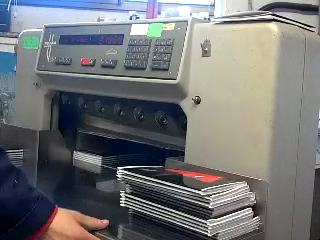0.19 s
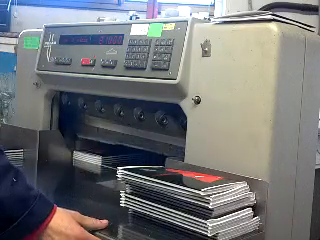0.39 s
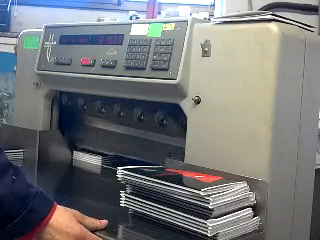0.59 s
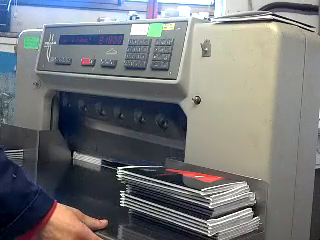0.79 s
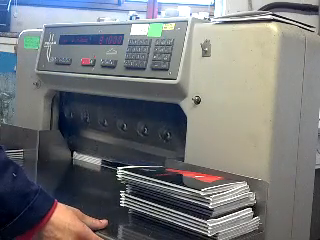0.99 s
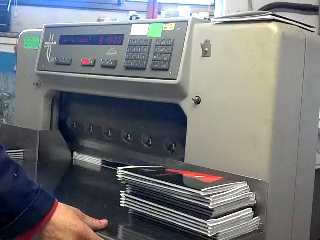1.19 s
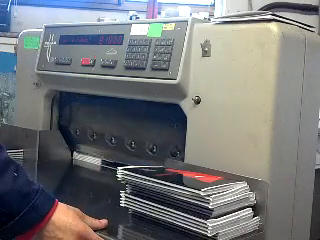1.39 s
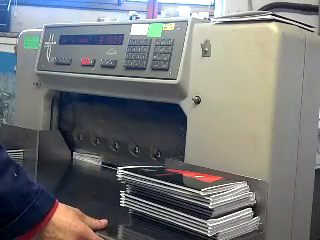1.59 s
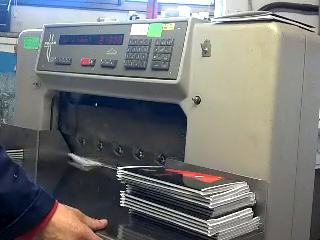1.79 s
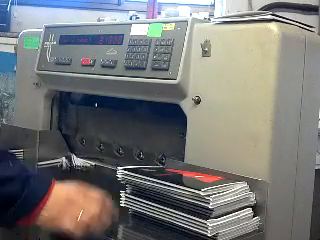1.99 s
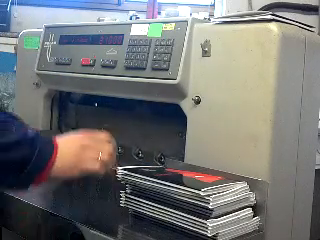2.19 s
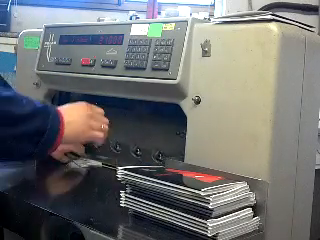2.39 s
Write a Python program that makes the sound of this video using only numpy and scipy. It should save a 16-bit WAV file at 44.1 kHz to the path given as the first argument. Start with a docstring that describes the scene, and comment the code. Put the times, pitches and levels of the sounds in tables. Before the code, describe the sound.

Heavy paper cutting machine cycles once, clanking down, whirring under load, slicing a stack, then knocking to rest

```python
"""A paper guillotine makes one cut in a workshop, heard in two channels close enough to lead the room.
Valves click, the clamp runs down and slams, the clutch bangs in and the brake knocks: noise bursts ring a frame.
The pump, a stack of overtones, sags under load and partly recovers; filtered noise makes the gear train roar.
The knife rasps through the stack in bright noise clumps, over a workshop hum of shaped noise.
The channels share the treble in even bands and fade out above 11 kHz."""
import sys
import numpy as np
from scipy import signal
from scipy.fft import rfft, irfft, next_fast_len
from scipy.io import wavfile
from scipy.ndimage import uniform_filter1d, map_coordinates

SR = 44100
rng = np.random.default_rng(int(sys.argv[2]) if len(sys.argv) > 2 else 0)


def dump_mix(stems):
    """Bounce the given channels to the path in sys.argv[1] as a 16-bit WAV at rate SR."""
    frames = np.atleast_2d(stems).T  # one column per channel
    limited = np.clip(frames, -1, 1)  # hard clip at full scale
    pcm = np.round(limited * 32767).astype(np.int16)
    wavfile.write(sys.argv[1], SR, pcm)


def gain_from_db(level_db):
    """Convert decibel levels to linear amplitude factors (20 dB per decade)."""
    decades = np.asarray(level_db, float) / 20
    return 10 ** decades


N = 105840  # samples, 2.4 s


def along(points, hz):
    """Reads (f/Hz, value) points on a log frequency axis."""
    f, v = np.transpose(points)
    return np.interp(np.log(hz + 1), np.log(f + 1), v)


def unit(x):
    """Scales x to rms 1."""
    return x / np.sqrt(np.mean(x ** 2) + 1e-20)


def curves(rows):
    """Gives one value per sample for each column after the time."""
    s, *cols = np.transpose(rows)
    return [np.interp(np.arange(N) / SR, s, c) for c in cols]


def wobble(rate, n):
    """A smooth random curve of n samples, with rate knots a second."""
    knots = rng.standard_normal(int(n * rate / SR) + 4)
    return map_coordinates(knots, [np.arange(n) * rate / SR])


def filtered(x, response):
    """Multiplies the spectrum of x by a response of frequency."""
    n = x.shape[-1]
    m = next_fast_len(n + 8192)  # room for the response to die away
    return irfft(rfft(x, m) * response(np.fft.rfftfreq(m, 1 / SR)), m)[..., :n]


def ringing(table):
    """Response of causal resonances (f/Hz, width/Hz, level/dB), summed with alternating sign."""
    def response(f):
        total = 0
        for k, (centre, width, db) in enumerate(table):
            damping = 1j * f * width
            total = total + (-1) ** k * gain_from_db(db) * damping / (centre * centre - f * f + damping)
        return total
    return response


ATTACK_S, RATTLE_PER_S = 0.0033, 700  # rise time constant; knots a second of the lumps


def burst(length_s, t60, rattle_db):
    """Noise in lumps: contacts come up quickly, hold for length_s, then decay."""
    t = np.arange(SR // 2) / SR
    shape = (1 - np.exp(-t / ATTACK_S)) * gain_from_db(-60 * np.maximum(t - length_s, 0) / t60)
    return shape * gain_from_db(rattle_db * wobble(RATTLE_PER_S, len(t))) * rng.standard_normal(len(t))


# blows in the mechanism: t/s, level/dB (loudest short stretch), rattle length/s, tilt/(dB per octave,
# gentler in the bass), f/Hz near which the struck part rings
BLOWS = [(0.131, -35.5, 0.027, 3.5, 1050), (0.208, -31, 0.0087, 14, 1210), (0.227, -24.5, 0.023, -4.5, 540),
         (.249, -24, 0.052, -4, 740), (.301, -19, 0.018, 4, 600), (0.321, -20, 0.002, -2, 970),
         (0.748, -21.5, 0.0015, 3.5, 1500), (.755, -22.5, 0.005, -0.5, 1730), (.768, -24, 0.032, 1, 386),
         (1.547, -39, 0.031, -0.5, 293), (1.629, -38.5, .08, -5, 283), (1.76, -33.5, 0.024, -6.5, 205),
         (1.822, -29, 0.0016, -5.5, 675), (1.842, -25, 0.034, -5, 320), (1.863, -40, 0.023, -6.5, 201),
         (1.932, -45, 0.011, -11, 630), (2.082, -31.5, 0.0072, -12, 663), (2.09, -31.5, 0.016, 1, 1400),
         (2.112, -40, 0.02, -6, 440), (2.144, -42, 0.071, -20.5, 457), (2.322, -52, 0.0039, 2, 530)]
# modes of the cast frame: f/Hz, relative level/dB, t60/s
FRAME_MODES = [(153, -2, .15), (205, 0, .12), (283, 0, .16), (340, 0, .14), (430, -3, .16), (478, -3, .22),
               (575, 0, .15), (670, -2, .16), (865, 0, .16), (1100, -4, .16), (1400, -3, .12),
               (1610, -4, .12), (1814, -5, .14), (3187, -10, .08)]
# colour of a blow before its tilt and ringing: f/Hz, level/dB
BLOW_COLOUR = [(60, -25.5), (110, -22), (150, -7), (200, -0.5), (600, -1), (1500, -3), (3000, -7),
               (5500, -16.5), (10800, -34.5)]
RING_DB, RATTLE_DB = 2.5, 3  # offset of every mode; unevenness of the rattle
DIES_S, REACH_OCTAVES = 0.11, 1  # t60 of a rattle; distance from the struck part at which modes lose 6 dB


def knocks():
    """Each blow is a short rattle of steel on steel that rings the nearby part of the frame."""
    out = np.zeros(N + SR)
    for s, db, length_s, bright_db, part_hz in BLOWS:
        modes = []
        for (hz, level, t60), scatter in zip(FRAME_MODES, rng.standard_normal(len(FRAME_MODES))):
            width_hz = np.log(1000) / np.pi / t60
            loss_db = 6 * (np.log2(hz / part_hz) / REACH_OCTAVES) ** 2
            mode_db = RING_DB + level + 10 * np.log10(t60 * 40) + 2 * scatter - loss_db
            modes.append((hz, width_hz, mode_db))

        def struck(f):
            colour_db = along(BLOW_COLOUR, f) + bright_db * np.log2((f + 250) / 900)
            return gain_from_db(colour_db) * (1 + ringing(modes)(f))

        blow = filtered(burst(length_s, DIES_S, RATTLE_DB), struck)
        loudest = np.sqrt(np.max(uniform_filter1d(blow ** 2, size=300)))
        out[round(s * SR):][:len(blow)] += gain_from_db(db) * blow / loudest
    return out[:N]


# single frame parts set shaking: t/s, level/dB, f/Hz, time driven/s
SHAKEN_PARTS = [(0.227, -32, 860, 0.013), (0.229, -34.5, 330, 0.032), (0.246, -34, 1550, 0.024),
                (.262, -28, 590, 0.053), (.32, -27, 300, 0.032), (.325, -33.5, 640, 0.02),
                (.752, -24.5, 285, 0.061), (0.752, -30, 1612, 0.0095), (.754, -36, 1818, 0.0093),
                (.76, -26.5, 640, 0.019), (.8, -40.5, 150, 0.197), (1.841, -34, 155, 0.052),
                (1.6, -34.5, 285, 0.091), (1.754, -32.5, 205, 0.029), (1.8, -29.5, 352, 0.048),
                (1.858, -23.5, 208, 0.0361), (1.885, -31.5, 510, 0.011), (1.915, -39, 670, 0.053),
                (2.035, -50, 670, 0.035), (2.09, -30.5, 861, 0.0063), (2.092, -40, 479, 0.048),
                (2.105, -33, 323, 0.017), (2.119, -44, 3187, 0.018), (2.145, -39.5, 479, 0.041),
                (2.17, -38.5, 335, 0.028), (2.324, -37.5, 570, 0.0078), (2.35, -53, 290, .02)]
RING_RISE_S, RING_T60, RING_SHAKE_DB = 0.0026, 0.059, 1.5  # rise/s, decay/s, level unevenness/dB


def rings():
    """One part rings at its own pitch while it is shaken, then dies away."""
    out, t = np.zeros(N + SR), np.arange(SR // 4) / SR
    for s, db, hz, driven_s in SHAKEN_PARTS:
        decay_db = -60 * np.maximum(t - driven_s, 0) / RING_T60
        shape = (1 - np.exp(-t / RING_RISE_S)) * gain_from_db(RING_SHAKE_DB * wobble(55, len(t)) + decay_db)
        turns = hz * t + 0.073 * wobble(64, len(t))
        out[round(s * SR):][:len(t)] += gain_from_db(db) * shape * np.sin(2 * np.pi * turns)
    return out[:N]


# spikes in the snaps of latches and the blade meeting the stick, rows at one time making one click:
# t/s, starting level of the tone/dB, f/Hz, t60/s
SPIKES = [(.133, -30, 1100, .035), (.137, -34, 7000, .04), (.143, -29, 3500, .03), (.168, -28, 600, .01),
          (.3315, -14, 2500, .004), (.7555, -17, 1800, .012), (1.82, -17, 700, .008),
          (1.82, -21, 9500, .003), (1.8202, -23, 4500, .003), (1.82, -24, 6900, .003),
          (1.8327, -17, 4200, .004), (1.8327, -22, 6900, .004), (1.8327, -19, 9500, .004),
          (2.094, -36, 1000, .015)]
CRACK, CRACK_REACH = .9, 5  # noise rms against the tone's peak; noise corner over the tone's frequency


def snaps():
    """Each row is a spike with a broad ring and a crack of noise; rows at one time make one click."""
    out, t = np.zeros(N), np.arange(SR // 20) / SR
    for s, db, hz, t60 in SPIKES:
        keep = np.exp(-2 * np.pi * CRACK_REACH * hz / SR)
        noise = unit(signal.lfilter([1], [1, -keep], rng.standard_normal(len(t))))
        tone = np.cos(2 * np.pi * hz * t)
        out[round(s * SR):][:len(t)] += gain_from_db(db - 60 * t / t60) * (tone + CRACK * noise)
    return filtered(out, lambda f: f * f / (f * f + 200 ** 2))  # takes off the bass


# resonances of the machine casing: f/Hz, width/Hz, level over the direct sound/dB
CASING_MODES = [(145.8, 15.6, 13), (213, 48, 13), (309.7, 39, 8), (383, 64, 10), (683.4, 44, 4),
                (805, 82, 8.5), (1111, 44, 6), (1235, 24, 7.5), (2570, 69, 3)]


def casing(f):
    """Gain of the resonant casing around the pump and gears, without phase."""
    return np.abs(1 + ringing(CASING_MODES)(f))


# pump course: t/s, pulse rate f/Hz, level over the overtone tables/dB,
# brightness/(dB per octave about the third overtone, flat above the sixth)
PUMP_COURSE = [(.3, 299.4, -71, -6), (.42, 298.7, -38, 1.5), (.55, 296.9, -37.5, 0),
               (.74, 295.8, -31.5, -0.5), (.8, 231.8, -39.5, 13.5), (.85, 231.7, -39, -3),
               (.91, 223.5, -36, -7.5), (.95, 229.1, -35, -2), (.98, 238.1, -34.5, -2.5),
               (1.0, 257.2, -35, -2), (1.08, 262, -35, -0.5), (1.15, 271.8, -35, -3),
               (1.3, 273.1, -34.5, -0.5), (1.5, 274.2, -31, -3), (1.62, 276, -39, -1),
               (1.72, 274.9, -37, 2), (1.8, 275.5, -42.5, 7.5), (1.95, 278.4, -60, -3),
               (2.05, 261, -75, -6)]
# overtone levels when idling: f/Hz, level/dB
IDLING_COLOUR = [(296, 0), (592, -5), (888, -10.5), (1184, -18), (1480, -27.5), (1776, -26.5),
                 (2072, -21.5), (2660, -37), (3256, -34), (3552, -26), (4440, -31), (5300, -33.5),
                 (6500, -43), (8300, -32.5), (10000, -32.5)]
# overtone levels under load, before the casing: f/Hz, level/dB
LOADED_COLOUR = [(200, -18.5), (300, -12), (440, 2), (560, -6.5), (700, 6), (850, -12), (1100, -10),
                 (1400, -8.5), (2000, -11), (4000, -12.5), (10000, -40)]
LOAD_S = .77  # the clutch closes
JITTER_FREE, JITTER_LOADED, WANDER = 0.003, 0.016, 0.035  # pulses: quick scatter; slow, loaded shaft only
SCATTER_DB, WAVER_FREE_DB, WAVER_LOADED_DB = 1.5, 2, 3  # whole level; each overtone idling and loaded


def pump():
    """The piston pulses as 37 overtones: clean when idling, rougher and throatier under load."""
    rate_hz, level_db, bright_db = curves(PUMP_COURSE)
    loaded = np.arange(N) / SR > LOAD_S
    jitter = np.where(loaded, JITTER_LOADED, JITTER_FREE) * wobble(120, N)
    turns = np.cumsum(rate_hz) / SR + jitter + WANDER * loaded * wobble(25, N)
    k = np.arange(1, 38)[:, None]
    db = np.where(loaded, along(LOADED_COLOUR, k * rate_hz), along(IDLING_COLOUR, k * rate_hz))
    # each overtone swells on its own
    knots = rng.standard_normal((len(k), 90))
    waver = np.array([np.interp(np.arange(N), np.linspace(0, N, 90), row) for row in knots])
    db += np.where(loaded, WAVER_LOADED_DB, WAVER_FREE_DB) * waver
    db += bright_db * np.log2(np.minimum(k, 6) / 3)
    phases = rng.random((len(k), 1))
    stack = np.sum(gain_from_db(db) * np.sin(2 * np.pi * (k * turns + phases)), axis=0)
    stack = np.where(loaded, filtered(stack, lambda f: .5 * casing(f)), stack)
    return gain_from_db(level_db + SCATTER_DB * wobble(60.02, N)) * stack


# gear mesh tones, one list each: t/s, f/Hz, level/dB (all played 1 dB up)
MESH_TONES = [
    [(0.98, 767, -53), (1.02, 775, -32), (1.074, 780, -40), (1.146, 831.0, -53), (1.224, 808, -31.5),
     (1.306, 816, -44.5), (1.404, 818.7, -36.5), (1.46, 851.6, -40), (1.482, 819, -45), (1.586, 821, -31.5),
     (1.602, 816.3, -56), (1.65, 837.8, -48), (1.722, 808, -40), (1.78, 822, -47)],
    [(1.1, 870.3, -44.5), (1.25, 888, -44), (1.35, 906, -49), (1.42, 929, -44), (1.5, 914, -43),
     (1.56, 893, -53)],
    [(0.97, 703.2, -30), (0.994, 677, -38), (1.034, 668, -43.5), (1.14, 711, -48)],
    [(1.1, 1202, -65), (1.17, 1190, -41), (1.188, 1194, -62), (1.4, 1203, -38)],
]
WHINE_WAVER_HZ, WHINE_WAVER_DB, WHINE_FADE_S = 10.97, 3, .02


def whine():
    """Meshing gears sing a few unsteady tones beside the pump's overtones."""
    t, out = np.arange(N) / SR, np.zeros(N)
    for rows in MESH_TONES:
        hz, db = curves(rows)
        gate = np.clip(np.minimum(t - rows[0][0], rows[-1][0] - t) / WHINE_FADE_S, 0, 1)
        turns = np.cumsum(hz + WHINE_WAVER_HZ * wobble(39.95, N)) / SR
        level = gain_from_db(db + 1 + WHINE_WAVER_DB * wobble(35.55, N))
        out += gate * level * np.sin(2 * np.pi * turns)
    return out


# gear train and oil: t/s, level/dB, brightness (each step lifts the treble by 3.44 dB)
DRIVE_COURSE = [(.13, -70, 4.5), (.15, -57, -2), (.2, -43, 2.5), (.24, -33.5, -0.5), (.34, -27.5, 3.5),
                (.37, -27.5, -6), (.45, -35.5, -2), (.56, -42, -1), (.73, -44.5, -1), (.78, -24, -4),
                (.92, -35, 1), (1.1, -41.5, 3.5), (1.3, -44.5, 4), (1.5, -37.5, 3), (1.7, -40, 1.5),
                (1.8, -34.5, 0.5), (1.86, -31.5, -1), (1.95, -38.5, 1.5), (2.02, -45.5, -3),
                (2.2, -48, -7.5), (2.3, -75.5, 8.5)]
# colour of the gear noise before the casing: f/Hz, level/dB
GEAR_COLOUR = [(60, -8.5), (110, -3.5), (160, -3.5), (300, 3), (700, 3), (1200, -5), (2500, -12),
               (5000, -13.5), (7000, -21.5), (10800, -13)]


def drive():
    """Meshing teeth and oil: grainy noise through the casing, with changing brightness."""
    level_db, bright = curves(DRIVE_COURSE)
    grain = gain_from_db(1.0 * wobble(300, N) + 1.52 * wobble(25.53, N)) * rng.standard_normal(N)
    body = unit(filtered(grain, lambda f: gain_from_db(along(GEAR_COLOUR, f)) * casing(f)))
    low = filtered(body, lambda f: 1 / (1 + (f / 1500) ** 2))
    return gain_from_db(level_db) * (low + gain_from_db(3.44 * bright) * (body - low))


# the knife tearing sheets: t/s, level/dB (all played 7.5 dB up, before the paper's colour), length/s
TEARS = [(1.511, -47, 0.024), (1.566, -41, 0.027), (1.6, -42, 0.0095), (1.647, -48, 0.026),
         (1.687, -51, 0.021), (1.725, -42, 0.03), (1.754, -63, 0.016)]
# colour of tearing paper: f/Hz, level/dB
PAPER_COLOUR = [(1000, 5), (2500, -0.5), (5000, 0.5), (8000, 3.5), (10800, 3.5)]


def knife():
    """Sheets part in bright scratchy clumps of noise."""
    out = np.zeros(N + SR)
    for s, db, length_s in TEARS:
        out[round(s * SR):][:SR // 2] += gain_from_db(db + 7.5) * burst(length_s, 0.033, 2.64)
    return filtered(out[:N], lambda f: gain_from_db(along(PAPER_COLOUR, f)))


# workshop background: t/s, level/dB
FLOOR_LEVEL = [(0, -51), (.06, -58), (.125, -65), (.14, -68), (.3, -85), (2.2, -56), (2.318, -65),
               (2.335, -42), (2.4, -54.5)]
# colour of the hum: f/Hz, relative level/dB
HUM_COLOUR = [(60, -35), (150, -5), (330, 1), (450, -7.5), (1200, -16.5), (3300, -18), (3600, -36),
              (10800, -39)]
FLUTTER_DB = 2.5


def floor():
    """Shaped noise: the last of an earlier noise fades in the workshop hum, which comes up near the end."""
    level_db, = curves(FLOOR_LEVEL)
    hum = unit(filtered(rng.standard_normal((2, N)), lambda f: gain_from_db(along(HUM_COLOUR, f))))
    return gain_from_db(level_db + FLUTTER_DB * wobble(10, N)) * hum


# decay of the workshop: f/Hz, t60/s
SHOP_DECAY = [(150, 0.58), (500, 0.29), (2000, 0.32), (10000, 0.31)]


def shop(x):
    """Two unlike answers of the room, each frequency dying at its own speed."""
    hz, t, z = signal.stft(rng.standard_normal((2, SR // 2)), SR, nperseg=256)
    decay = gain_from_db(-60 * t / along(SHOP_DECAY, hz)[:, None])
    tail = signal.istft(z * decay, SR, nperseg=256)[1]
    late = np.pad(x, (200, 0))[None]  # the room answers 200 samples later
    return signal.fftconvolve(late, tail / np.linalg.norm(tail[0]), axes=1)[:, :N]


ROOM_DB = -4.5


def scene():
    """Two unlike pick-ups of the machine; blows feed the room most, tones least, gear noise not at all."""
    hits = knocks() + rings()
    hum = pump() + whine()
    near = snaps() + knife()
    room = gain_from_db(ROOM_DB) * shop(hits + .5 * hum + 0.68 * near)
    gears = np.array([drive(), drive()])  # a separate noise for each pick-up
    return hits + hum + near + room + gears + floor()


# stereo width below the first treble band: f/Hz, side over mid level/dB
BASS_WIDTH = [(60, -1.5), (150, -4), (500, -7), (900, -7), (1150, -12), (1280, -18)]
LAG = 16  # samples; sets the spacing of the treble bands
SHARP = 0.7  # how abruptly one band hands over to the next


def side_angle(f):
    """Angle whose cosine and sine share each frequency between the channels' sum and difference."""
    bands = np.arctan(np.abs(np.tan(np.pi / 2 - np.pi * f * LAG / SR)) ** SHARP)
    return np.where(f < BASS_WIDTH[-1][0], np.arctan(gain_from_db(along(BASS_WIDTH, f))), bands)


GATE_MID, GATE_SIDE, GATE_GROWS = 0.4, 0.41, 0.33  # shares at 2800 Hz; power by which they grow with f
TOP_HZ, ROLL_DB_PER_KHZ, BASS_HZ = 10810, 34, 94.5


def kept(share, gate, f):
    """Gaps and band limits: a share under the gate drops out, more so in the treble; both ends roll off."""
    held = share / (1 + (gate * (f / 2800) ** GATE_GROWS / (share + 1e-6)) ** 6)
    treble = gain_from_db(-ROLL_DB_PER_KHZ * np.maximum(f - TOP_HZ, 0) / 1000)
    return held * treble / (1 + (BASS_HZ / (f + 1)) ** 2)


def band_limit(x):
    """A steep low-pass at the top of the band."""
    return signal.sosfilt(signal.butter(12, 12100, fs=SR, output="sos"), x)


def record(dry):
    """Sum and difference of the channels share alternating bands, up to a quarter turn apart either way."""
    knots = rng.standard_normal(120)  # one each 300 Hz

    def smear(f):
        lean = map_coordinates(knots, [f / 300], mode="nearest")
        return np.exp(.5j * np.pi * np.tanh(2.5 * lean))

    mid = filtered(dry[0], lambda f: kept(np.cos(side_angle(f)), GATE_MID, f))
    side = filtered(dry[1], lambda f: smear(f) * kept(np.sin(side_angle(f)), GATE_SIDE, f))
    return band_limit(np.array([mid + side, mid - side]))


dry = scene()
out = record(dry)
dump_mix(out)
```